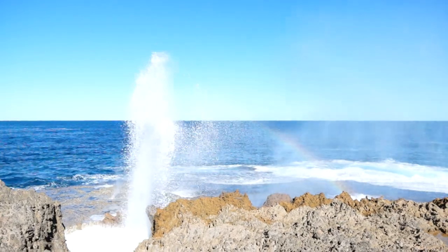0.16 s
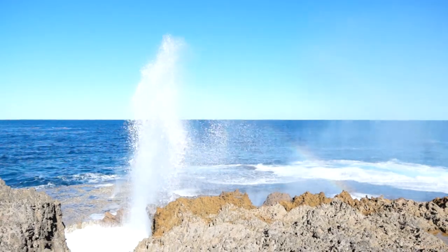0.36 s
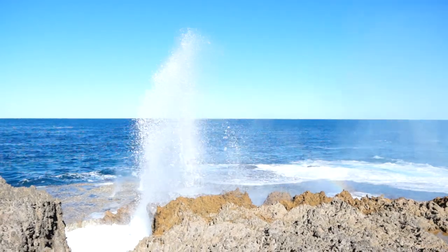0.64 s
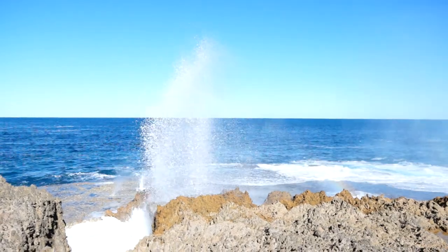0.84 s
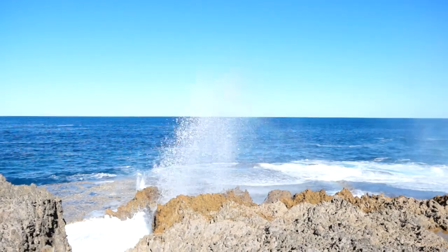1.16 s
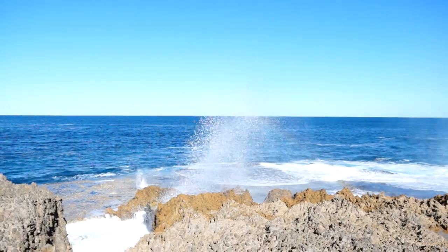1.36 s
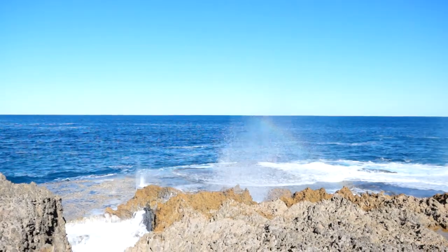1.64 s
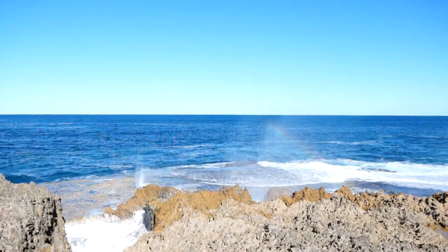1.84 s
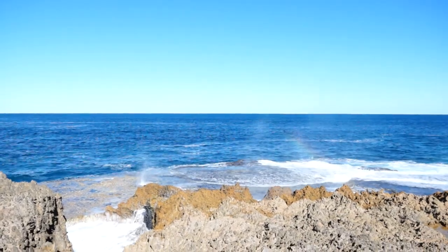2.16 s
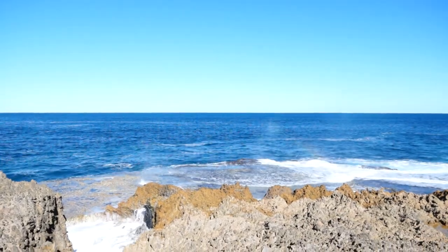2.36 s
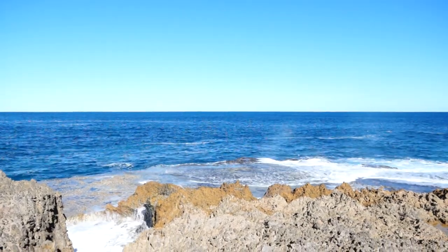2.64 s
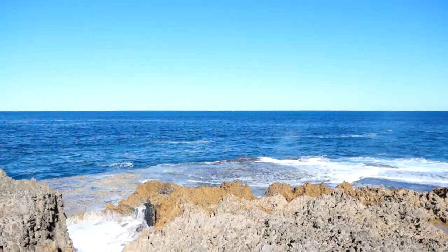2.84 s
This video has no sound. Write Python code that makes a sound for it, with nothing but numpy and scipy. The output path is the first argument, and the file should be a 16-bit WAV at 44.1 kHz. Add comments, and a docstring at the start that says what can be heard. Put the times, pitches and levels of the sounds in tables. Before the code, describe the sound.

Loud, close wind buffeting flutters and thumps unevenly from start to end. Faintly behind, spray from a coastal blowhole hisses, then fades to nothing by about two seconds, while low surf wash dips late.

```python
"""Blowhole in gusty wind

A blowhole on a rocky shore throws up spray: bright noise whose level drops in steps, then dies away.
Surf noise washes behind, its level dipping late on.
Gusty wind buffets two microphone ports: deep swell and rumble are shaped noise, sputter is random
pressure pulses of three eddy sizes, and pops are single pulses with a brief rasp.
"""
import sys
import numpy as np
from scipy import signal
from scipy.fft import rfft, irfft
from scipy.io import wavfile
from scipy.ndimage import uniform_filter1d, minimum_filter1d

SR = 44100
rng = np.random.default_rng(int(sys.argv[2]) if len(sys.argv) > 2 else 0)


def generate_wav(signal):
    """Clip the signal to [-1, 1] and save it as 16-bit WAV at the path in sys.argv[1]."""
    frames = np.transpose(np.atleast_2d(signal))
    scaled = np.clip(frames, -1, 1) * 32767
    pcm = np.round(scaled).astype(np.int16)
    wavfile.write(sys.argv[1], SR, pcm)


N = 132741
HZ = np.maximum(np.arange(N + 1) * SR / (2 * N), 1)  # bins of an FFT padded to 2 N


def from_db(db):
    """Decibels to amplitude gain."""
    return 10 ** (np.asarray(db) / 20)


def rms_one(x):
    """Scale to unit power."""
    return x / np.sqrt(np.mean(x ** 2) + 1e-20)


def in_time(rows):
    """Control curve at every sample."""
    return np.interp(np.arange(N) / SR, *np.transpose(rows))


def by_hz(points):
    """Table at every FFT bin, interpolated over log frequency."""
    hz, value = np.transpose(points)
    return np.interp(np.log(HZ), np.log(hz), value)


def filtered(x, response):
    """Apply a frequency response; zero padding limits wrap-around."""
    return irfft(rfft(x, 2 * N) * response)[..., :N]


def drift(rate_hz):
    """Random motion: white noise through two equal one-pole low-passes, unit RMS, clipped at 2."""
    r = np.exp(-2 * np.pi * rate_hz / SR)
    white = rng.standard_normal(N + SR)
    settled = signal.lfilter([1], [1, -2 * r, r * r], white)[SR:]
    return np.clip(rms_one(settled), -2, 2)


def stereo_noise(colour, likeness):
    """Stereo noise: colour sets the spectrum, the mid/side split sets left-right correlation."""
    alike = np.clip(by_hz(likeness), -1, 1)
    mid_side_gain = np.sqrt([1 + alike, 1 - alike])
    white = rng.standard_normal((2, N))
    mid, side = filtered(white, from_db(by_hz(colour)) * mid_side_gain)
    return rms_one(np.array([mid + side, mid - side]))


# heard surf level, dipping after 1.5 s and partly recovering: (time [s], level [dB])
SURF_LEVEL = [(0, -38.5), (1.5, -37), (2.2, -45.5), (2.55, -52), (2.75, -45), (3.0, -48)]
# surf spectrum: (frequency [Hz], relative density [dB per Hz])
SURF_SPECTRUM = [(30, -31), (100, -12), (200, 0), (500, 1.5), (1200, -12.5), (3000, -19.5), (5000, -36),
                 (8000, -26.5), (11000, -40), (16000, -42)]
# surf left-right correlation: (frequency [Hz], correlation [-1 to 1])
SURF_CORRELATION = [(100, 1), (1000, 1), (3000, 0.23), (15000, .15)]
SURF_SWAY_DB, SURF_SWAY_HZ = -1.5, 10


def surf():
    """Waves wash over the rock shelf: broadband noise with a swaying level."""
    level_db = in_time(SURF_LEVEL) + SURF_SWAY_DB * drift(SURF_SWAY_HZ)
    return from_db(level_db) * stereo_noise(SURF_SPECTRUM, SURF_CORRELATION)


# heard hiss level, stepping down briefly near 0.2 s and lastingly near 1.4 s: (time [s], level [dB])
SPRAY_LEVEL = [(0, -48.5), (.19, -47), (.22, -52), (.5, -47), (.8, -46), (1.0, -48), (1.38, -48),
               (1.45, -58.5), (1.6, -57), (1.7, -55.5), (1.95, -58), (2.1, -70), (2.4, -88), (3.0, -88)]
# spray spectrum: (frequency [Hz], relative density [dB per Hz])
SPRAY_SPECTRUM = [(300, -25), (1200, -10), (2500, 3), (3800, 4), (4600, -1.5), (5250, -6), (6300, 4.5),
                  (7500, 4), (8500, 2), (10000, -5), (11200, -6), (12500, -6.5), (14200, -4), (16000, -10)]
# spray left-right correlation: (frequency [Hz], correlation [-1 to 1])
SPRAY_CORRELATION = [(500, .7), (2000, .1), (3700, 1), (5200, -0.49), (6500, 0.91), (8200, 1),
                     (10000, 0.74), (11200, -0.2), (12500, 0.82), (15000, .87)]
SPRAY_GRAIN_DB, SPRAY_GRAIN_HZ = 1.5, 110


def spray():
    """The jet and its falling droplets: fine, bright hiss with a grainy level."""
    level_db = in_time(SPRAY_LEVEL) + SPRAY_GRAIN_DB * drift(SPRAY_GRAIN_HZ)
    return from_db(level_db) * stereo_noise(SPRAY_SPECTRUM, SPRAY_CORRELATION)


# slow, deep buffeting before SWELL_DB: (time [s], level [dB])
SWELL_LEVEL = [(0.0, -30), (0.04, -34), (0.08, -32.5), (0.52, -35), (0.55, -32), (0.59, -46), (0.72, -29.5),
               (0.73, -46), (0.89, -34), (1.21, -29), (1.24, -40), (1.34, -23.5), (1.37, -37), (3.0, -40)]
# swell spectrum: (frequency [Hz], relative density [dB per Hz])
SWELL_SPECTRUM = [(25, -45), (50, -36), (80, -17.5), (125, -6), (190, 1.5), (300, 0.5), (500, -11.5),
                  (1000, -36), (2000, -62)]
# swell left-right correlation: (frequency [Hz], correlation [-1 to 1])
SWELL_CORRELATION = [(30, -.5), (70, -0.027), (140, 0.97), (300, 0.41), (600, .1)]
SWELL_DB = 1.5


def swell():
    """The slowest eddies press on each port in its own way: deep, partly correlated noise."""
    return from_db(in_time(SWELL_LEVEL) + SWELL_DB) * stereo_noise(SWELL_SPECTRUM, SWELL_CORRELATION)


# gust strength: (time [s], level [dB])
GUST_LEVEL = [(0.0, -22.5), (0.5, -25.5), (0.56, -20.5), (0.58, -32.5), (0.65, -24.5), (0.78, -31.5),
              (0.85, -28), (0.87, -20.5), (1.19, -22.5), (1.26, -27.5), (1.28, -45), (1.3, -19.5),
              (1.34, -24.5), (1.36, -36), (1.39, -23.5), (1.55, -23), (1.62, -30.5), (1.64, -23.5),
              (1.76, -23), (1.78, -26), (1.83, -18.5), (1.91, -30.5), (1.92, -22), (2.15, -26), (2.2, -20),
              (2.26, -32), (2.27, -28), (2.41, -22), (2.43, -31), (2.45, -21), (2.61, -27), (2.62, -21),
              (2.66, -31), (2.95, -25.5), (2.98, -20), (3.0, -32)]
# rumble spectrum: (frequency [Hz], relative density [dB per Hz])
RUMBLE_SPECTRUM = [(25, -60), (80, -26.5), (125, -17.5), (190, -7), (300, 0), (480, 0), (750, -6),
                   (1100, -21.5), (1700, -35), (3000, -61.5)]
# rumble left-right correlation before the ports: (frequency [Hz], correlation [-1 to 1])
RUMBLE_CORRELATION = [(100, 0.92), (350, 0.65), (700, .9), (2000, 0.72)]
RUMBLE_FLUTTER_DB = 1.75


def rumble(flutter):
    """Large eddies merge into a fluttering roar that follows the gusts."""
    level_db = in_time(GUST_LEVEL) + RUMBLE_FLUTTER_DB * flutter
    return from_db(level_db) * stereo_noise(RUMBLE_SPECTRUM, RUMBLE_CORRELATION)


def puffs(kicks, rolloff_hz):
    """Each kick becomes a short pressure pulse; smaller eddies roll off higher."""
    lowpass = signal.butter(3, rolloff_hz, fs=SR, output="sos")
    return signal.sosfilt(lowpass, kicks + 1e-18)


# eddy sizes, coarse to fine: (roll-off [Hz], low edge [Hz], rate [1/s], level offset [dB])
EDDY_SIZES = [(1400, 59, 1600, 4), (3380, 920, 1000, 5.5), (7000, 2430, 900, 8)]
# turbulence strength per size, before the level offset: (time [s], level [dB])
COARSE_LEVEL = [(0.03, -27), (0.05, -23), (0.08, -31.5), (0.31, -27), (0.32, -39), (0.42, -33.5),
                (0.85, -41.5), (0.87, -32), (1.08, -25.5), (1.3, -37.5), (1.33, -26), (1.6, -25.5),
                (1.61, -34), (1.74, -24.5), (1.94, -26), (2.28, -23.5), (2.44, -33), (2.61, -25.5),
                (2.82, -37), (2.92, -41), (2.97, -30), (3.0, -37)]
MEDIUM_LEVEL = [(0.0, -40), (0.05, -36.5), (0.15, -42.5), (0.8, -46.5), (1.11, -40), (1.29, -48),
                (1.42, -41), (1.44, -45.5), (2.33, -41.5), (2.47, -50), (2.53, -38), (2.87, -54),
                (2.88, -47), (2.91, -59), (2.98, -43.5), (3.0, -53)]
FINE_LEVEL = [(0, -59), (.08, -51), (.15, -65), (.3, -55), (.6, -63), (.85, -65), (.97, -52.5), (1.1, -47),
              (1.2, -50), (1.27, -59), (1.41, -43), (1.47, -50.5), (1.53, -47.5), (1.65, -50.5),
              (1.78, -46.5), (2.0, -50.5), (2.12, -48.5), (2.33, -51.5), (2.44, -66), (2.54, -51.5),
              (2.6, -62), (2.72, -58.5), (2.82, -68), (3.0, -63)]
# eddy response, also used by pops: (frequency [Hz], relative gain [dB])
EDDY_RESPONSE = [(60, -24), (200, -12.5), (450, -2.5), (800, 0.5), (1250, -6), (2100, -9.5), (3300, -11.5),
                 (4600, -16), (5800, -21), (7200, -29.5), (10000, -36), (16000, -49)]
EDDY_SPREAD_DB, EDDY_BUNCH_DB, EDDY_OWN_DB = 4, 1.9, -11  # per kick, with flutter, per port


def sputter(flutter):
    """Small eddies hit at random, harder in bunches; each size follows its turbulence, finer ones lose more bass."""
    out = 0
    levels = (COARSE_LEVEL, MEDIUM_LEVEL, FINE_LEVEL)
    for (rolloff_hz, low_hz, per_s, offset_db), level in zip(EDDY_SIZES, levels):
        born = rng.random(N) < per_s / SR
        sign = rng.choice([-1, 1], N)
        spread = np.clip(rng.standard_normal(N), -2, 2)
        kicks = born * sign * from_db(EDDY_SPREAD_DB * spread + EDDY_BUNCH_DB * flutter)
        pair = kicks * (1 + from_db(EDDY_OWN_DB) * rng.standard_normal((2, N)))
        bass_cut = HZ ** 2 / (HZ ** 2 + low_hz ** 2)
        pulses = filtered(puffs(pair, rolloff_hz), from_db(by_hz(EDDY_RESPONSE)) * bass_cut)
        out = out + rms_one(pulses) * from_db(in_time(level) + offset_db)
    return out


# hardest eddies, before POP_DB: (time [s], peak level [dB], roll-off [Hz])
HARD_EDDIES = [(.0463, -18, 4500), (0.0851, -12.5, 4170), (.169, -16, 1190), (.300, -7, 1490),
               (0.4, -15.5, 4000), (0.49, -32, 1200), (.608, -19, 1400), (.641, -14, 1500),
               (.812, -20, 1200), (.871, -10.5, 1400), (1.002, -10, 1800), (1.0354, -5, 5000),
               (1.102, -14, 6500), (1.2057, -15, 4000), (1.329, -11, 5500), (1.4167, -14, 5000),
               (1.509, -28, 5000), (1.5552, -14.5, 6000), (1.876, -16.5, 6000), (1.909, -14.5, 8040),
               (2.104, -11, 10000), (2.214, -14, 7500), (2.346, -18, 7500), (2.369, -18, 11000),
               (2.450, -9.5, 1300), (2.4855, -24, 8000), (2.5371, -10.5, 7000), (2.636, -21, 5000),
               (2.879, -17, 2930), (2.947, -21.5, 3800), (2.972, -13, 1400)]
POP_DB, POP_TAIL_S, POP_TAIL_DB = 1, 0.0013, -18.5
POP_SAMPLES = 2048


def pops():
    """Single hard eddies slap the ports and break up in a brief, decaying rasp."""
    half = POP_SAMPLES // 2
    out = np.zeros(N + POP_SAMPLES)
    age = np.arange(POP_SAMPLES) - half
    pop_hz = np.arange(half + 1) * SR / POP_SAMPLES
    response = np.interp(pop_hz, HZ, from_db(by_hz(EDDY_RESPONSE)))
    tail = (age > 0) * from_db(POP_TAIL_DB) * np.exp(-np.abs(age) / SR / POP_TAIL_S)
    for time_s, peak_db, rolloff_hz in HARD_EDDIES:
        kick = (age == 0) + tail * rng.standard_normal(POP_SAMPLES)
        pulse = irfft(rfft(puffs(kick, rolloff_hz)) * response)
        start = int(time_s * SR)
        out[start:start + POP_SAMPLES] += from_db(peak_db + POP_DB) * pulse / np.abs(pulse).max()
    return out[half:][:N]  # kick sits mid-window


# phase of left behind right: (frequency [Hz], lag [rad])
PORT_PHASE = [(100, 0), (280, -0.32), (520, 1.0), (900, 1.4942), (2000, 2), (6000, 1.63)]
# level of left over right: (frequency [Hz], difference [dB])
PORT_LEVEL = [(200, 0), (700, .9), (1500, 1), (3000, 3), (6000, 4)]


def at_ports(x):
    """Moving air meets the ports with frequency-dependent phase lag and a stronger left treble."""
    left = from_db(by_hz(PORT_LEVEL) / 2) * np.exp(-1j * by_hz(PORT_PHASE) / 2)
    return filtered(x, np.array([left, 1 / left]))


FLUTTER_HZ = 55


def scene():
    """Wind on the ports in front of spray and surf; rumble and sputter share one flutter."""
    flutter = drift(FLUTTER_HZ)
    background = surf() + spray()
    wind = swell() + at_ports(rumble(flutter) + sputter(flutter) + pops())
    return background + wind


CEILING, CUTOFF_HZ = 0.47, 15800  # limiter threshold [full scale], low-pass edge


def record(dry):
    """A fast stereo-linked limiter holds down the hardest buffets; a steep low-pass cuts the top."""
    room = np.minimum(1, CEILING / (np.abs(dry).max(axis=0) + 1e-9))
    held = minimum_filter1d(room, size=260)
    gain = uniform_filter1d(uniform_filter1d(held, size=130), size=130)
    lowpass = signal.ellip(12, 0.1, 90, CUTOFF_HZ, fs=SR, output="sos")
    return signal.sosfilt(lowpass, dry * gain)


dry = scene()
out = record(dry)
generate_wav(out)
```